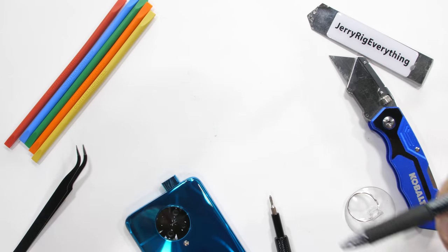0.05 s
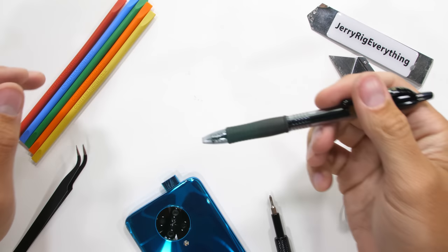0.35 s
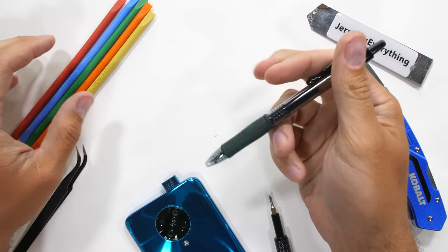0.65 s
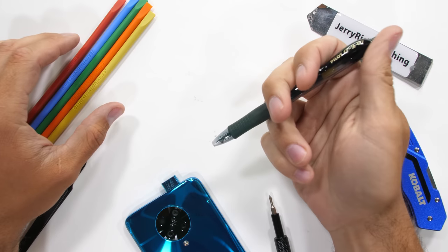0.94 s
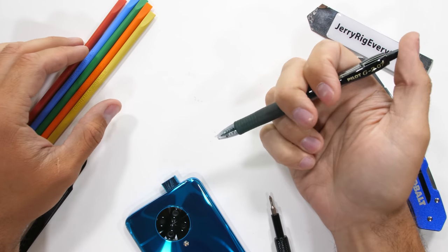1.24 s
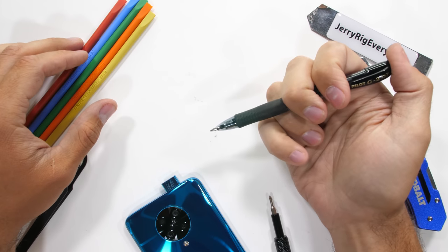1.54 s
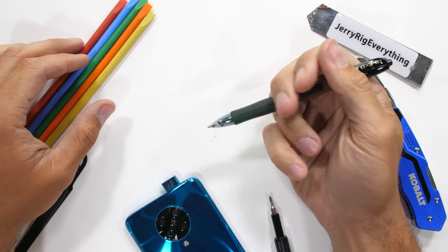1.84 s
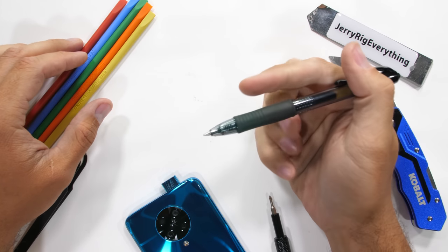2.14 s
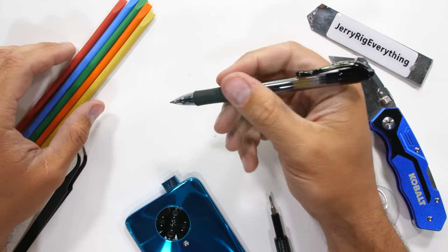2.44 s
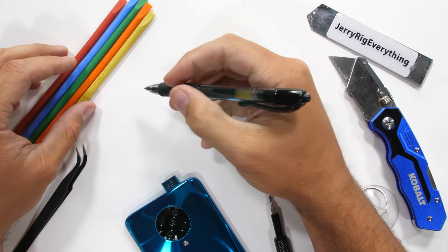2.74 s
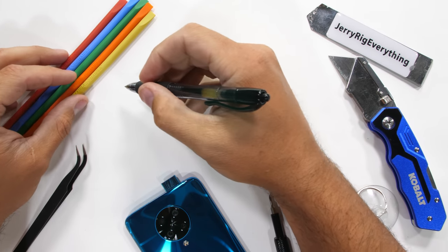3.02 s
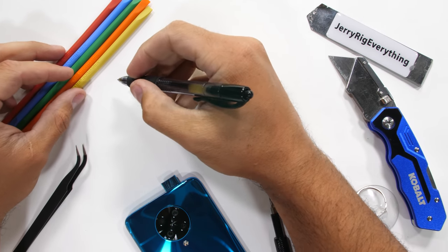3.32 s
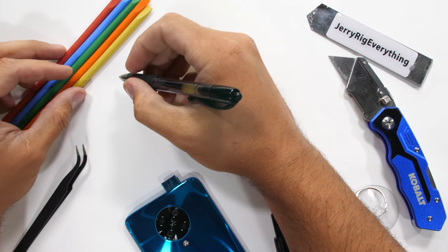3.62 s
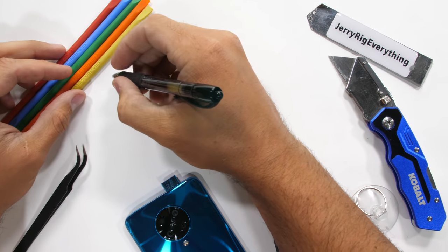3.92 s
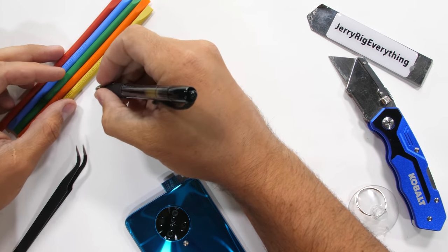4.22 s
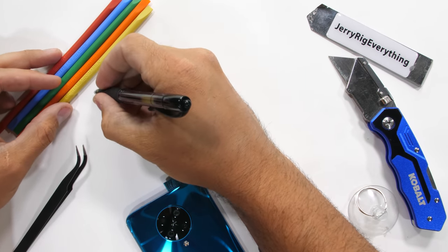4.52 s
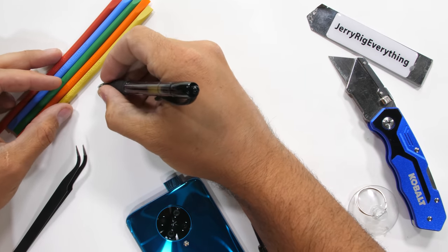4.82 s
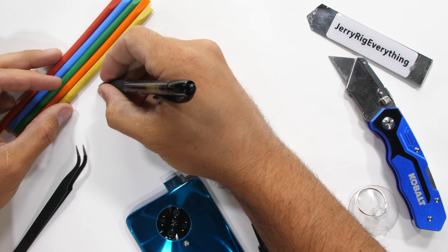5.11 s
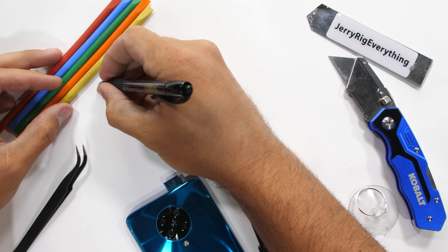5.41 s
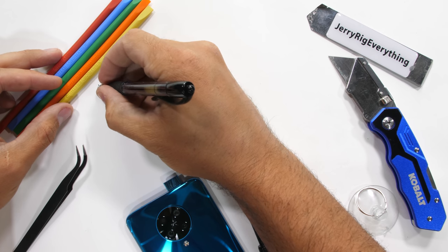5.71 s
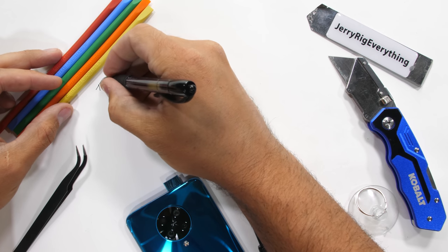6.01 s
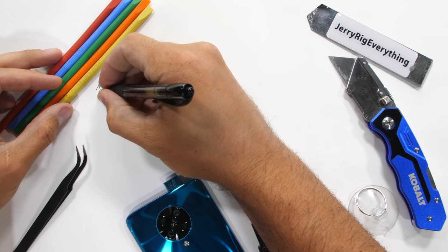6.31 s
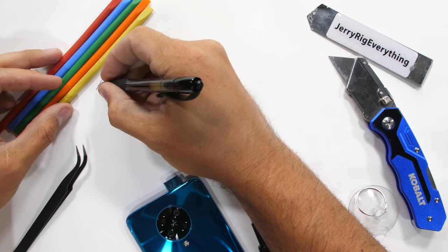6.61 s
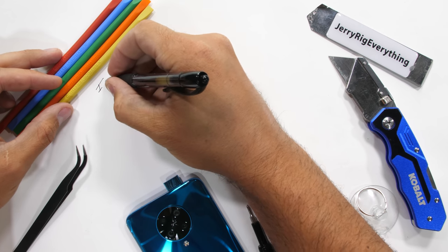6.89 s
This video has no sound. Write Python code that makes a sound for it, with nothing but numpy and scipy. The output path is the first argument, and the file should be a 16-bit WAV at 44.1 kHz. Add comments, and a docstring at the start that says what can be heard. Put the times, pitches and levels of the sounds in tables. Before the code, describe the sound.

Fingers turn a retractable pen and click it, then a hand slides across paper and writes three short, scratchy strokes.

```python
"""Fingers brush and tick on a retractable pen as they turn it; then its button snaps down and springs back.
A hand slides over paper on a desk, its heel sticking and slipping, and the tip draws three short strokes:
the ball bumps over the paper's grain, which scratches and makes the desk top drum.
One close microphone in a small, dry room with faint air noise and a low hum."""
import sys
import numpy as np
from scipy import signal
from scipy.fft import rfft, irfft, next_fast_len
from scipy.io import wavfile
from scipy.ndimage import uniform_filter1d

SR = 44100
rng = np.random.default_rng(int(sys.argv[2]) if len(sys.argv) > 2 else 0)


def inscribe(sig):
    """Save sig as 16-bit PCM at rate SR to the path in sys.argv[1].

    A 1-D sig is mono; a 2-D sig holds one channel per row.
    Samples are clipped to [-1, 1] before scaling.
    """
    pcm = np.round(np.clip(np.atleast_2d(sig).T, -1, 1) * 32767)
    wavfile.write(sys.argv[1], SR, pcm.astype(np.int16))


N = 306495

# press, release: (time [s], rattle [dB], crack [dB], echo [dB], echo low-pass [Hz])
BUTTON_SNAPS = [(1.5866, -9, -16, -30, 7600), (1.7394, -18.5, -1, -23, 11640)]
# barrel and spring: (frequency [Hz], t60 [s], press level [dB], release level [dB])
PEN_MODES = [(800, 0.0071, -27.5, -33.5), (1295, 0.0045, -30, -58), (2000, 0.0067, -22.5, -14),
             (2740, 0.004, -28, -14.5), (3490, 0.013, -21, -16), (4050, 0.01, -25, -19.5),
             (4480, 0.019, -23, -26), (5610, 0.0068, -22, -11), (6460, 0.016, -39, -18.5),
             (6797, 0.011, -24.5, -12.5), (7640, 0.0072, -17.5, -15.5), (8340, 0.0097, -21, -14.5),
             (10230, 0.0053, -21, -5.5), (11150, 0.003, -20, -5), (12500, 0.0067, -27, -21.5),
             (13480, 0.0053, -30, -19), (14300, .004, -27, -18.5)]


def button():
    """The cam snaps over, then back: a dry crack, the barrel struck at two places, a short echo."""
    out, t = np.zeros(N), np.arange(N // 16) / SR
    for stage, (s, rattle_db, crack_db, echo_db, top_hz) in enumerate(BUTTON_SNAPS):
        blow = contact(rattle_db, rattle_s=0.001)
        crack = contact(rattle_db=-1.5, rattle_s=0.0026)   # many small modes that die at once
        barrel = sum((-1) ** k * from_db(stage_db[stage]) * ring(blow, hz, t60_s)
                     for k, (hz, t60_s, *stage_db) in enumerate(PEN_MODES))
        add(out, s, barrel + from_db(crack_db) * cut(crack, 1300, "high"))
        echo = rng.standard_normal(len(t)) * (1 - np.exp(-t / 0.021)) * np.exp(-t / 0.017)
        add(out, s, from_db(echo_db) * cut(cut(echo, 2200, "high"), top_hz, "low"))
    return out


# tip resonances: (frequency [Hz], level [dB], t60 [s])
TIP_MODES = [(1400, -21, 0.03), (2530, -8.5, 0.018), (3100, -37, 0.022), (3700, -22, 0.0029)]
# tip on paper: (frequency [Hz], gain [dB])
SCRATCH_SPECTRUM = [(700, -7), (900, 6.5), (1150, -4.5), (1400, -4.5), (1700, 0), (1950, -6.5), (2420, -3),
                    (3150, 0.5), (4200, -8), (6900, -17.5), (8200, -12.5), (10500, -12.5), (16000, -30)]


def writing():
    """The ball bumps over the paper's grain: it scratches, and the same bumps drum on the desk."""
    scratch_gain, hiss_gain, drum_gain = stroke_gains()
    bumps = grains(per_s=700, spread_db=1.5)
    fibres = grains(per_s=5000, spread_db=2.5) * from_db(4.1 * drift(rate_hz=200))
    paper = friction(resonant(fibres + bumps, TIP_MODES), SCRATCH_SPECTRUM, scratch_gain, hiss_gain)
    drum = cut(desk(bumps), 990, "low", order=1)
    drum = unit_band(cut(drum, 215, "high", order=3), 150, 500)
    steady_drum = drum / np.sqrt(uniform_filter1d(drum ** 2, size=1500) + 1e-9)   # even hand pressure
    return from_db(-3) * paper + from_db(-4) * drum_gain * steady_drum


# pen strokes: (time [s], length [s], scratch gain [dB], hiss gain [dB], drum gain [dB])
STROKES = [(5.553, 0.13, -47, -53, -39.5), (5.948, 0.1, -41.5, -47.5, -33),
           (6.492, 0.089, -48, -50.5, -38.5)]


def stroke_gains(hiss_power=1.7, drum_power=0.83, drum_fade_db_per_s=254):
    """Scratch, hiss and drumming follow the tip's speed; the drumming lingers."""
    gains, fade_db = np.zeros((3, N)), drum_fade_db_per_s * np.arange(N) / SR
    for s, length_s, scratch_db, hiss_db, drum_db in STROKES:
        speed = move(s, length_s, attack_s=0.063, release_s=0.058)
        drive_db = drum_power * 20 * np.log10(speed + 1e-9)
        lingering_db = np.maximum.accumulate(drive_db + fade_db) - fade_db
        gains[0] += from_db(scratch_db) * speed
        gains[1] += from_db(hiss_db) * speed ** hiss_power
        gains[2] += from_db(drum_db + lingering_db)
    return gains


# turning the pen: (time [s], length [s], rub gain [dB], hiss [dB re rub], cupped ring [dB re rub])
BRUSHES = [(0.0, 0.14, -61.5, -35, -5), (.24, 0.36, -57, -5, 2.5), (.57, 0.15, -66, -9, -3),
           (.698, .15, -54, -7, 0.5), (.85, .39, -56.5, -11.5, -0.5), (1.065, 0.082, -59, -4, 4),
           (1.3, 0.21, -71.5, -1.5, -11), (1.472, 0.031, -51.5, -11.5, -4), (1.5, 0.14, -63, -13, -17.5),
           (1.68, 0.063, -58, -7.5, -16), (1.78, .62, -70.5, -2, -21), (1.89, 0.088, -69, 2.5, 1)]
# cupped fingers: (frequency [Hz], level [dB], t60 [s])
FINGER_MODES = [(3000, -2.5, 0.0047), (3400, -5.5, 0.004), (4360, -12.5, 0.0054)]
# skin on pen: (frequency [Hz], gain [dB])
BRUSH_SPECTRUM = [(200, -2), (350, 2), (600, -9.5), (1050, -6.5), (1600, -9.5), (2300, -7.5), (2900, -3),
                  (3250, -7.5), (3850, -6), (4400, -13), (5200, 4), (6200, -9), (10000, -19), (16000, -24)]


def fingers():
    """Skin brushes the pen under a wavering pressure; the cupped fingers resonate."""
    force = grains(per_s=9600, spread_db=1.5) * from_db(drift(rate_hz=170))
    rub_gain, hiss_gain, cupped_gain = rub_gains(BRUSHES, attack_s=0.052, release_s=0.05)
    ringing = resonant(force, FINGER_MODES)
    brush = friction(ringing, BRUSH_SPECTRUM, rub_gain, hiss_gain)
    cupped = unit_rms(cut(ringing, [2900, 4600], "band"))
    return from_db(-1) * (brush + cupped_gain * cupped)


# small hand shifts: (time [s], length [s], rub gain [dB], hiss [dB re rub])
SHIFTS = [(4.68, .17, -59.5, -8), (6.1, 0.12, -65, -5), (6.61, 0.04, -63.5, -1), (6.755, .12, -50, -5),
          (6.885, .15, -56.5, -7)]
# skin on paper: (frequency [Hz], gain [dB])
PALM_SPECTRUM = [(200, 0.5), (300, -3), (520, 2.5), (630, -4.5), (950, -2), (1250, 1.5), (1800, -1),
                 (2500, -0.5), (3150, 2.5), (4100, -6.5), (5300, -12), (7000, -14.5), (12800, -21),
                 (16000, -32)]


def palm():
    """The palm slides and shifts on the paper: very fine grains under a wavering pressure."""
    force = grains(per_s=16000, spread_db=2.5) * from_db(0.67 * drift(rate_hz=51))
    rub_gain, hiss_gain = slide_gains() + rub_gains(SHIFTS, attack_s=0.046, release_s=0.043)
    return from_db(-3) * friction(force, PALM_SPECTRUM, rub_gain, hiss_gain)


# hand speed as rub gain, one list per slide: (time [s], gain [dB])
SLIDES = [
    [(2.365, -53), (2.403, -54), (2.457, -47.5), (2.639, -45.5), (2.799, -45.5), (2.965, -44), (2.975, -41),
     (3.039, -49.5), (3.05, -44.5)],
    [(3.05, -48), (3.206, -52.5), (3.28, -50), (3.354, -45.5), (3.4, -53), (3.468, -50.5), (3.642, -56.5),
     (3.69, -69)],
    [(3.69, -67.5), (3.7, -58.5), (3.822, -50.5), (4.034, -46.5), (4.142, -49), (4.408, -48.5),
     (4.44, -64.5), (4.5, -70.5)],
]
# per slide, at reference speed: (hiss [dB re rub])
SLIDE_HISS_DB = [-6, -6.5, -8.5]


def slide_gains(reference_db=-46.5, weight_db=-0.5, hiss_power=1.48, ease_s=0.024):
    """Rub and hiss follow the hand's speed through three long slides."""
    t = np.arange(N) / SR
    times_s, rub_db = np.concatenate(SLIDES).T
    touching = move(times_s[0] - ease_s, times_s[-1] - times_s[0] + 2 * ease_s, ease_s, ease_s)
    speed = from_db(np.interp(t, times_s, rub_db) - reference_db) * touching
    hiss_db = np.interp(t, times_s, np.repeat(SLIDE_HISS_DB, [len(rows) for rows in SLIDES]))
    return from_db(reference_db + weight_db) * np.array([speed, from_db(hiss_db) * speed ** hiss_power])


# stick-slip: (time [s], length [s], desk [dB], low-pass [Hz], thud [dB re desk], rasp [dB re desk])
JUDDERS = [(2.838, 0.11, -44, 2000, -10, -4.5), (2.923, .23, -50, 2000, -14, -5),
           (3.207, 0.26, -52, 2000, -12, -4), (3.294, .1, -49, 2000, -10.5, -0.5),
           (4.116, 0.38, -51, 263, -6.5, -20)]


def judder():
    """The heel of the hand slips in small jerks: it shakes the desk and thuds under its own weight."""
    out = np.zeros(N)
    slips = grains(per_s=700, spread_db=-3)
    shaking = desk(slips)
    thud = unit_rms(ring(slips, hz=137, t60_s=0.18))
    upper_modes = cut(shaking, 670, "high", order=4)
    rasp = unit_rms(cut(upper_modes, 1270, "low", order=1))
    for s, length_s, desk_db, top_hz, thud_db, rasp_db in JUDDERS:
        body = unit_band(cut(shaking, top_hz, "low", order=1), 153, 483)
        gain = from_db(desk_db) * move(s, length_s, attack_s=0.04, release_s=0.073)
        out += gain * (body + from_db(thud_db) * thud + from_db(rasp_db) * rasp)
    return out


# fingers, pen parts and tip: (time [s], peak [dB], pitch [Hz], bandwidth [Hz])
TICKS = [(.249, -50, 3260, 130), (.3495, -34, 940, 800), (.4285, -42.5, 1160, 1200),
         (.6405, -35.5, 3100, 400), (.8212, -35, 2000, 1400), (.9857, -35.5, 2970, 900),
         (.9881, -29.5, 1400, 1050), (1.2007, -38.5, 3200, 6000), (1.2602, -36, 3400, 6760),
         (1.2925, -39, 3200, 7017), (1.43, -40, 4000, 7056), (1.484, -41, 5160, 900),
         (1.7223, -28.5, 4340, 6000), (1.8365, -41.5, 6850, 7000), (1.92, -39, 6140, 3000),
         (2.339, -32, 8040, 4000), (2.342, -36, 3700, 1531), (4.871, -41.5, 9040, 7200),
         (4.951, -45, 6010, 9100), (5.289, -40.5, 2396, 1180), (5.528, -49, 8900, 6950),
         (5.567, -38, 3200, 4000), (5.8962, -39.5, 2400, 3000), (5.929, -48, 1800, 1500),
         (6.335, -49, 5860, 6900), (6.499, -41, 2200, 1500), (6.613, -47.5, 2200, 1500)]


def ticks():
    """Each light contact rings in one resonance; the wider its band, the shorter the tick."""
    out = np.zeros(N)
    for s, peak_db, hz, width_hz in [*TICKS, *faint_ticks()]:
        radius = np.exp(-np.pi * width_hz / SR)
        poles = [1, -2 * radius * np.cos(2 * np.pi * hz / SR), radius * radius]
        touch = contact(rattle_db=-2, rattle_s=1.3 / width_hz)
        tick = signal.lfilter([1, 0, -1], poles, touch + 1e-18)
        tick = cut(tick, hz + 2 * width_hz, "low")
        add(out, s, from_db(peak_db) * tick / np.abs(tick).max())
    return out


def faint_ticks(per_s=4.3, peak_db=-51, pitch_hz=6000, width_hz=5000, until_s=2.4):
    """Random tick rows while the fingers turn the pen."""
    wait, strength, octave = rng.random((64, 3)).T
    times_s = np.cumsum(-np.log(1 - wait)) / per_s
    rows = zip(times_s, peak_db + 6 * (strength - .5), pitch_hz * 2 ** (octave - .5))
    return [(s, db, hz, width_hz) for s, db, hz in rows if s < until_s]


# blows carried into the desk: (time [s], peak [dB], low-pass [Hz])
KNOCKS = [(.349, -43, 890), (0.6645, -46.5, 700), (0.987, -42, 600), (1.429, -36, 298), (1.5895, -40, 400),
          (1.7402, -37.5, 400), (2.168, -44.5, 704), (5.4351, -40, 300), (5.592, -36.5, 900),
          (5.648, -39, 700), (5.8932, -38, 924), (6.017, -30, 800), (6.374, -40.5, 493),
          (6.526, -30.5, 720)]


def knocks(damping_s=0.017):
    """Dull knocks carried into the desk from the tip, the hand and the thumb working the button."""
    out = np.zeros(N)
    for s, peak_db, top_hz in KNOCKS:
        blow = cut(contact(rattle_db=5, rattle_s=0.01), top_hz, "low", order=1)
        knock = desk(blow) * np.exp(-np.arange(len(blow)) / SR / damping_s)   # resting hand damps it
        add(out, s, from_db(peak_db) * knock / np.abs(knock).max())
    return out


# desk top: (frequency [Hz], level [dB], t60 [s])
DESK_MODES = [(217, 2, 0.079), (223.6, -4.5, 0.32), (251, 3.5, 0.049), (320.3, -3, 0.12),
              (377.6, -8.5, 0.1), (465, -14.5, 0.13), (537, -8, 0.038), (726, -13, 0.054),
              (826, -10, 0.043), (910, -15.5, 0.014), (1153, -16, 0.035), (1231, -21, .04),
              (1420, -15, 0.02), (2482, -8.5, .014), (3110, -2, 0.015)]


def desk(force):
    """The desk top rings in its modes and radiates little below the first."""
    modes = sum((-1) ** k * from_db(db) * ring(force, hz, t60_s)
                for k, (hz, db, t60_s) in enumerate(DESK_MODES))
    return cut(modes, 163.8, "high")


# skin on plastic and desk: (time [s], length [s], start pitch [Hz], end pitch [Hz], level [dB])
SQUEAKS = [(1.503, .095, 1259, 1478, -62.5), (4.379, 0.13, 316.3, 306.5, -46.5)]


def squeaks():
    """Slips briefly fall into step and make a gliding, unsteady tone."""
    out = np.zeros(N)
    for s, length_s, start_hz, end_hz, level_db in SQUEAKS:
        count = round(length_s * SR)
        hz = np.linspace(start_hz, end_hz, count) * (1 + 0.0029 * drift(rate_hz=500)[:count])
        envelope = from_db(level_db) * np.sin(np.linspace(0, np.pi, count))
        add(out, s, envelope * np.sin(2 * np.pi * np.cumsum(hz) / SR))
    return out


def room(x, wet_db=-16.5, t60_s=0.11, onset_s=0.017, top_hz=10900):
    """Near walls add a short, dense tail."""
    t = np.arange(16384) / SR
    tail = rng.standard_normal(len(t)) * from_db(-60 * t / t60_s) * np.minimum(t / onset_s, 1) ** 2
    tail = cut(tail, top_hz, "low")
    return x + from_db(wet_db) * signal.fftconvolve(x, tail / np.linalg.norm(tail))[:N]


# room air: (frequency [Hz], gain [dB])
AIR_SPECTRUM = [(12, -26.5), (20, -16), (70, -5.5), (88, -14), (113, -11), (150, -17.5), (255, -15),
                (328, -24), (410, -24.5), (624, -30), (873, -32.5), (1440, -34.5), (6010, -41.5),
                (12100, -41.5), (16000, -49)]


def air(level_db=-62.5):
    """Faint, steady air noise."""
    return from_db(level_db) * unit_band(coloured(rng.standard_normal(N), AIR_SPECTRUM), 92, 16000)


# low hum: (time [s], level [dB])
HUM_LEVELS = [(0, -47.5), (.25, -70.5), (0.949, -56.5), (3.6, -60), (3.95, -51.5), (4.4, -62.5),
              (6.95, -60.5)]


def hum(hz=61.6, width_hz=12):
    """A narrow band of noise makes a low, wavering hum."""
    drone = ring(rng.standard_normal(N + SR), hz, t60_s=np.log(1000) / np.pi / width_hz)
    drone = cut(cut(drone, 90, "low"), 40.25, "high")
    level_db = np.interp(np.arange(N) / SR, *np.transpose(HUM_LEVELS))
    return from_db(level_db) * unit_rms(drone[SR:])


def friction(force, spectrum, rub_gain, hiss_gain, split_hz=5500):
    """Rubbing noise, with separate gains for body and hiss."""
    noise = coloured(force, spectrum)
    body = unit_band(cut(noise, split_hz, "low", order=4), 1000, 5000)
    hiss = unit_band(cut(noise, split_hz, "high", order=4), 6000, 15000)
    return rub_gain * body + hiss_gain * hiss


def grains(per_s, spread_db):
    """Fibres catch and let go: impulses of random time and size."""
    sizes = from_db(spread_db * np.minimum(rng.exponential(1, N), 4)) * rng.choice([-1, 1], N)
    return unit_rms(sizes * (rng.random(N) < per_s / SR))


def contact(rattle_db, rattle_s):
    """One blow, then the parts chatter briefly."""
    t = np.arange(8192) / SR
    chatter = rng.standard_normal(len(t)) * (1 - np.exp(-t / rattle_s)) * np.exp(-t / rattle_s)
    return (t == 0) + from_db(rattle_db) * chatter / np.linalg.norm(chatter)


def move(s, length_s, attack_s, release_s):
    """Speed of one movement, 0-1: rise, hold if there is time, fall."""
    speed, t = np.zeros(N), np.arange(round(length_s * SR)) / SR
    rise = np.minimum(t / min(attack_s, length_s / 2), 1)
    fall = np.minimum((length_s - t) / min(release_s, length_s / 2), 1)
    add(speed, max(s, 0), np.sin(np.pi / 2 * rise) * np.sin(np.pi / 2 * fall))
    return speed


def rub_gains(rows, attack_s, release_s):
    """Gains for short movements: the rub, then the layers that ride on it."""
    return sum(np.outer(from_db(rub_db) * from_db([0, *layer_db]), move(s, length_s, attack_s, release_s))
               for s, length_s, rub_db, *layer_db in rows)


def resonant(force, modes):
    """A force plus the modes it keeps ringing."""
    return force + sum(from_db(db) * unit_rms(ring(force, hz, t60_s)) for hz, db, t60_s in modes)


def ring(x, hz, t60_s):
    """One mode: a unit impulse starts a decaying unit sine."""
    radius, angle = from_db(-60 / (t60_s * SR)), 2 * np.pi * hz / SR
    return signal.lfilter([0, np.sin(angle)], [1, -2 * radius * np.cos(angle), radius * radius], x + 1e-18)


def drift(rate_hz):
    """Random line segments, rms 1."""
    position = np.arange(N) / SR * rate_hz
    return unit_rms(np.interp(position, np.arange(4000), rng.standard_normal(4000)))


def coloured(x, spectrum):
    """Filter by (frequency [Hz], gain [dB]) points, rolling off below the first."""
    hz, db = np.transpose(spectrum)
    size = next_fast_len(N)
    bins_hz = np.maximum(np.arange(size // 2 + 1) * SR / size, 1)
    rolloff = np.minimum(bins_hz / hz[0], 1) ** 2
    gain = from_db(np.interp(np.log(bins_hz), np.log(hz), db))
    return irfft(rfft(x, size) * rolloff * gain, size)[:N]


def cut(x, hz, kind, order=2):
    sos = signal.butter(order, np.clip(hz, 10, .45 * SR), kind, fs=SR, output="sos")
    return signal.sosfilt(sos, x + 1e-18)


def unit_band(x, low_hz, high_hz):
    """Scale to rms 1 within the band."""
    return x / np.std(cut(x, [low_hz, high_hz], "band"))


def unit_rms(x):
    return x / np.sqrt(np.mean(x ** 2) + 1e-20)


def from_db(db):
    return 10 ** (np.asarray(db) / 20)


def add(out, s, sound):
    start = round(s * SR)
    out[start:start + len(sound)] += sound[:N - start]


def scene():
    """One microphone on both channels; the button carries its own echo."""
    near = fingers() + palm() + judder() + writing() + ticks() + knocks() + squeaks()
    mono = room(near) + button() + air() + hum()
    return np.array([mono, mono])


def record(dry):
    """Soft clip, then a steep 16.5 kHz low-pass."""
    rounded = 1.232 * np.tanh(dry / 1.036)
    return signal.sosfilt(signal.ellip(10, .1, 80, 16500, fs=SR, output="sos"), rounded)


dry = scene()
out = record(dry)
inscribe(out)
```